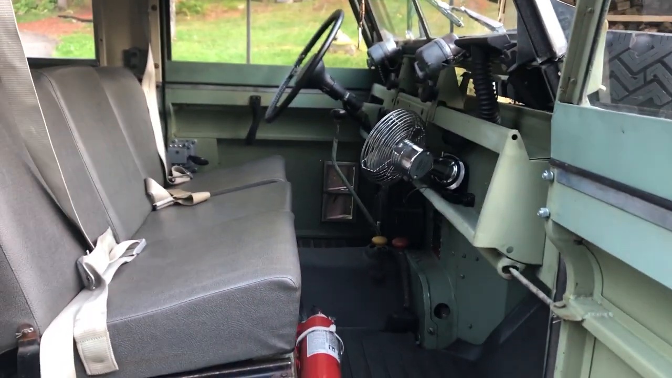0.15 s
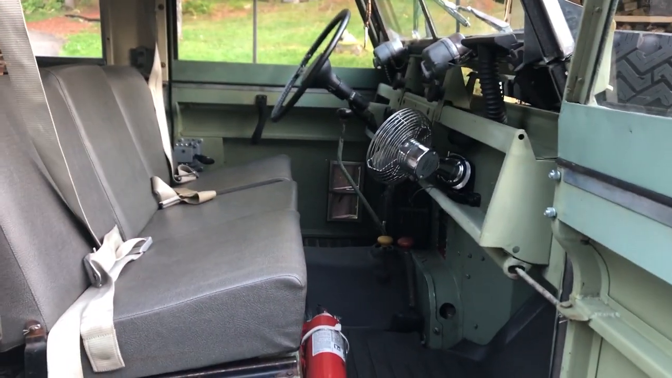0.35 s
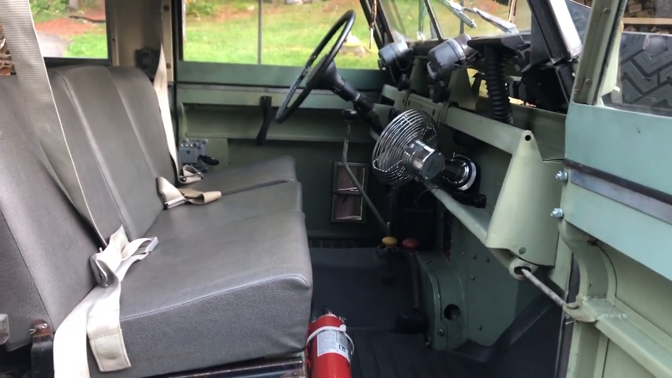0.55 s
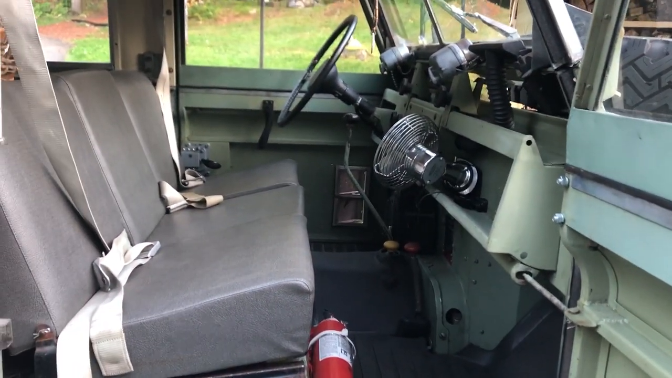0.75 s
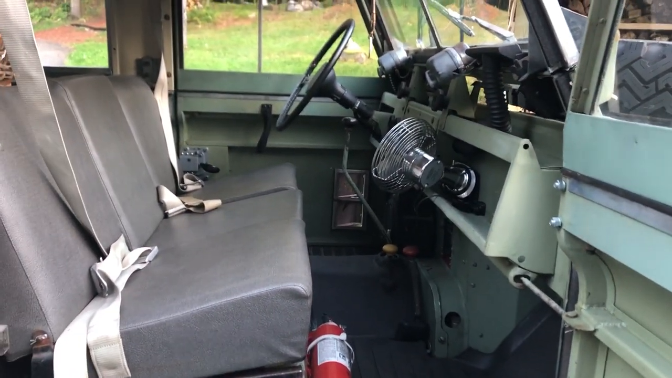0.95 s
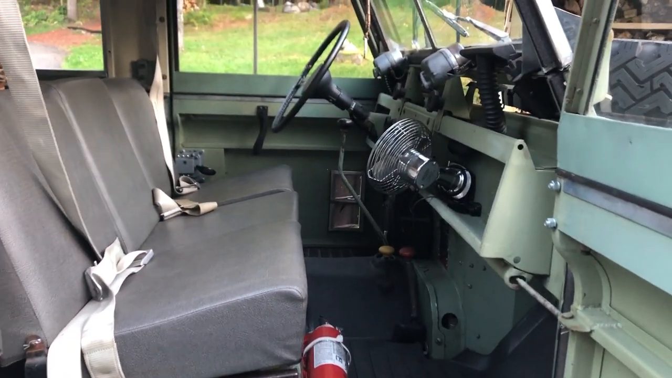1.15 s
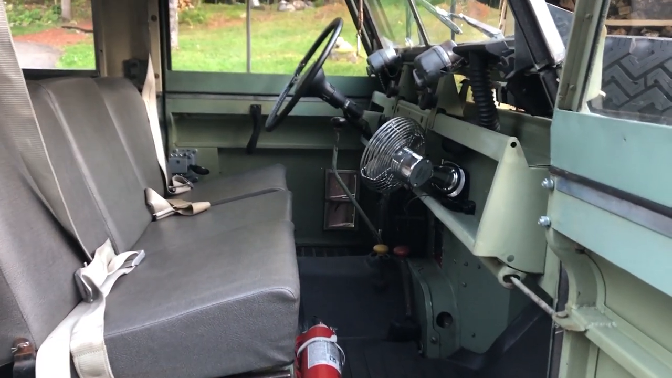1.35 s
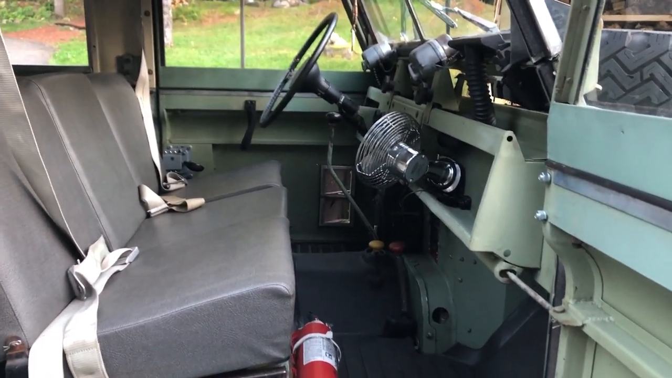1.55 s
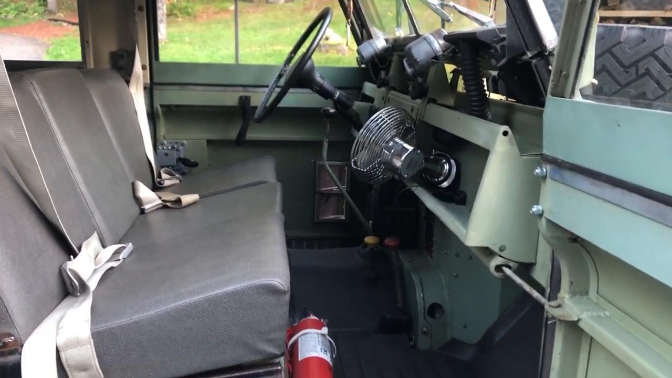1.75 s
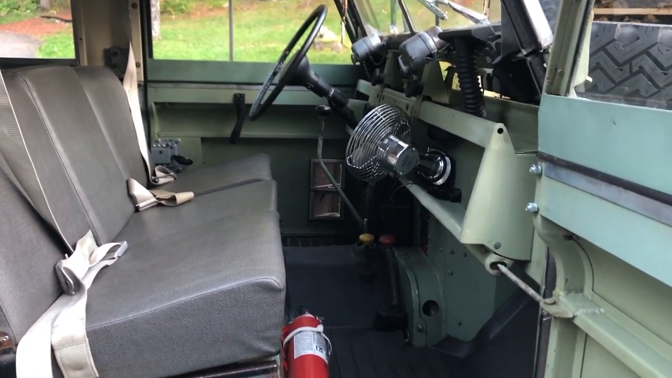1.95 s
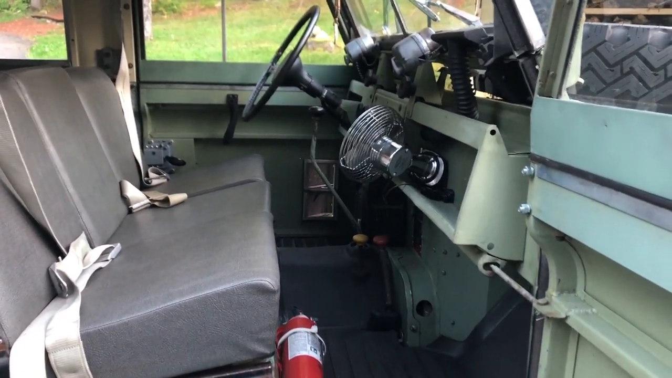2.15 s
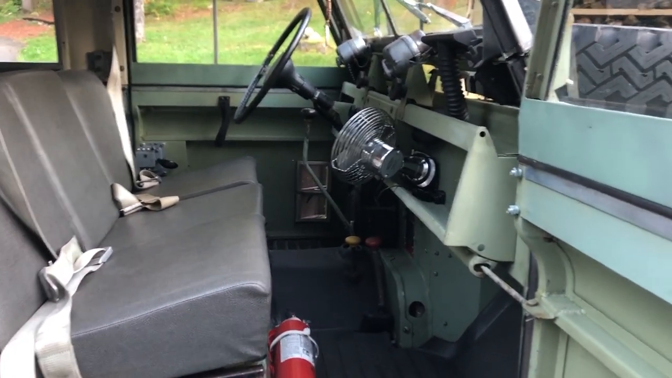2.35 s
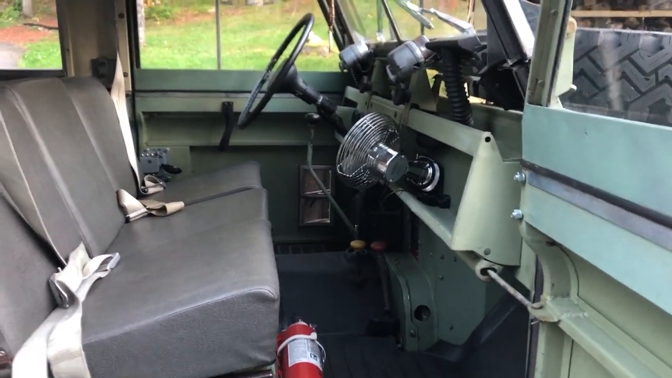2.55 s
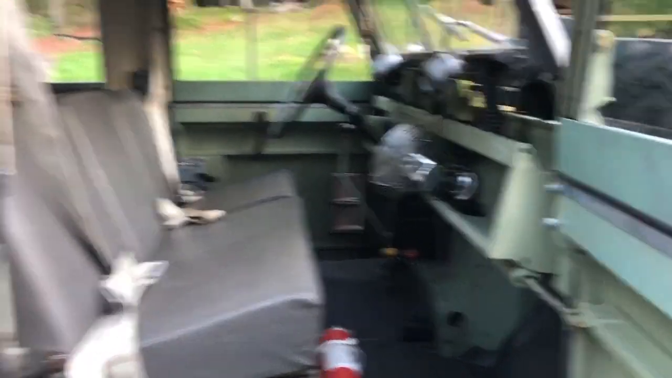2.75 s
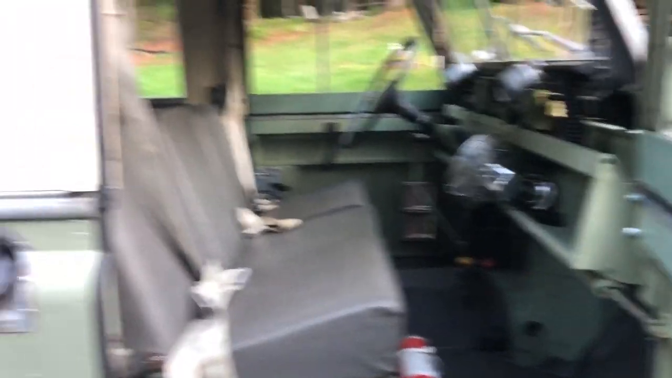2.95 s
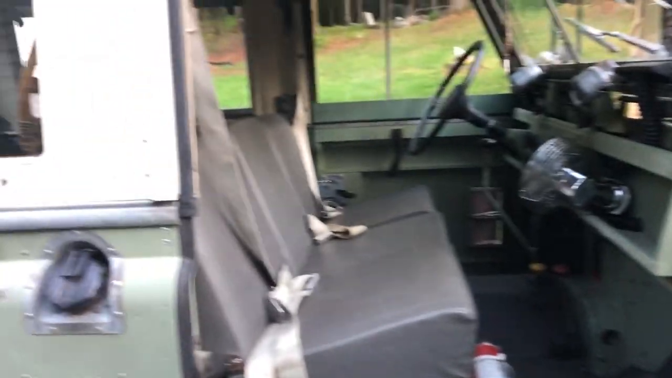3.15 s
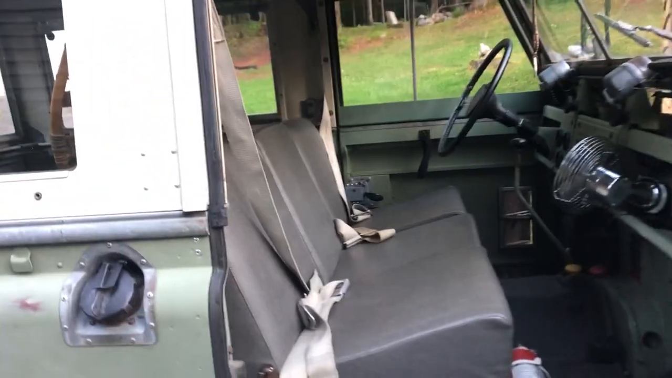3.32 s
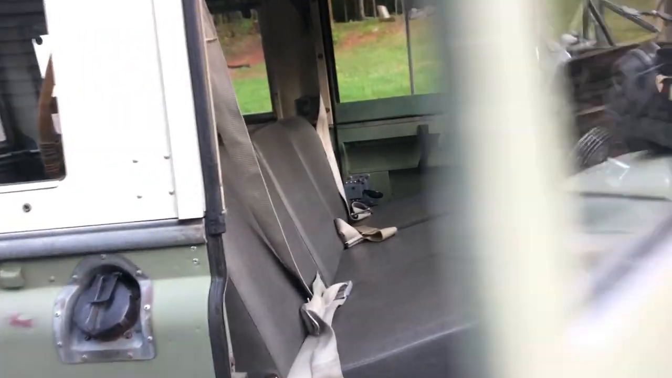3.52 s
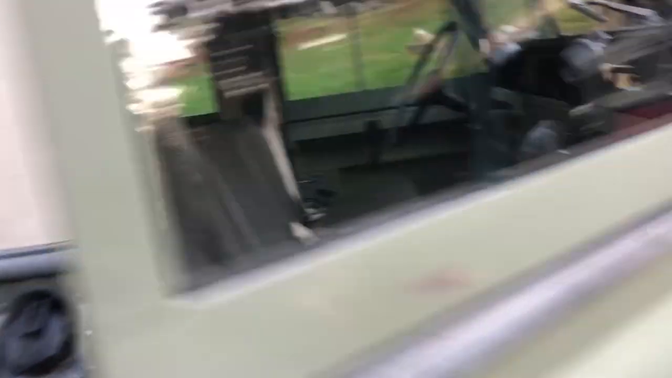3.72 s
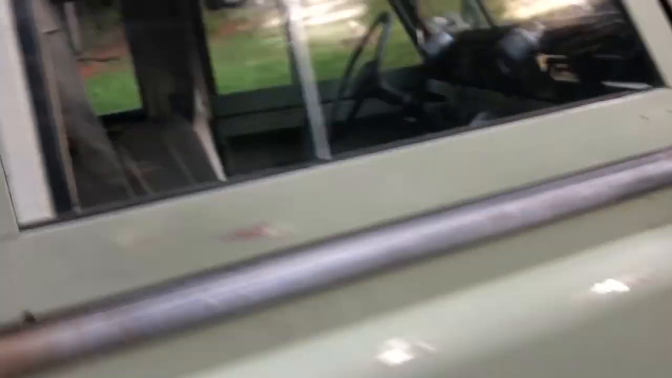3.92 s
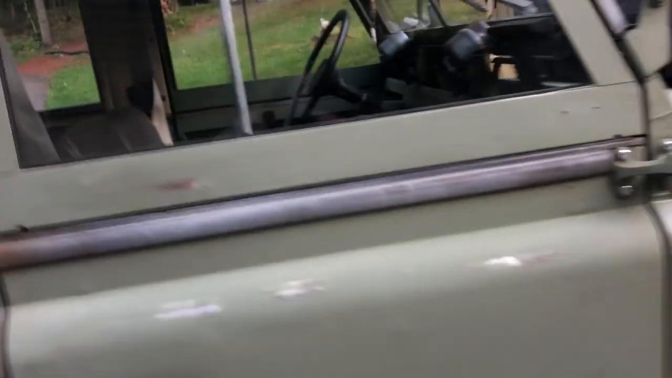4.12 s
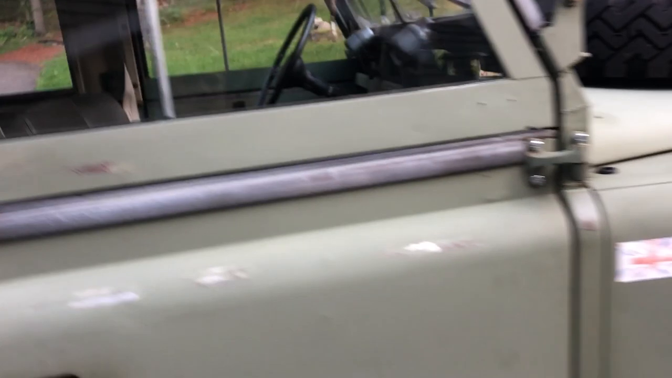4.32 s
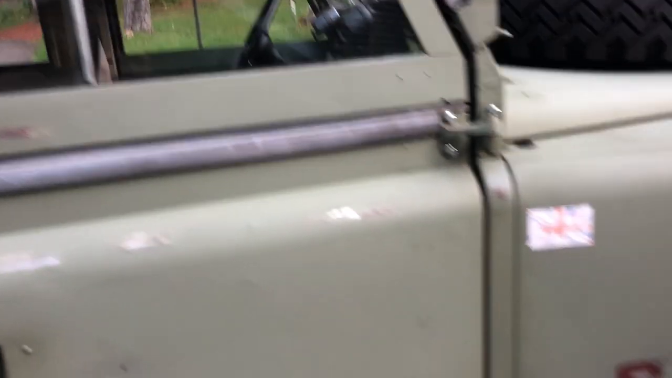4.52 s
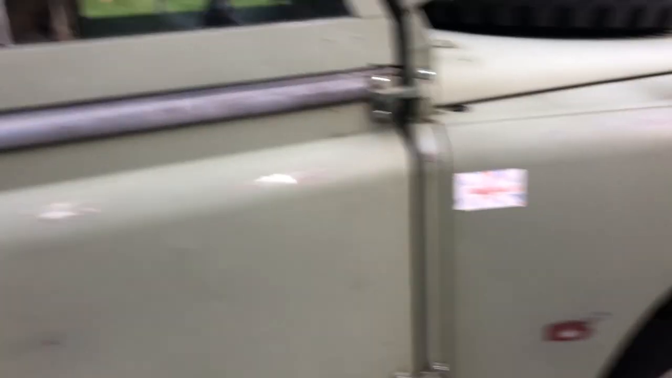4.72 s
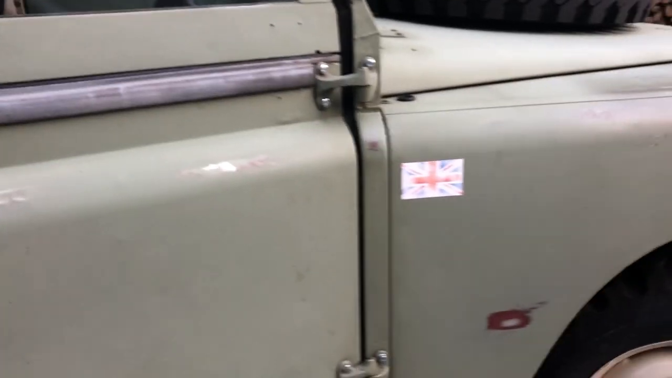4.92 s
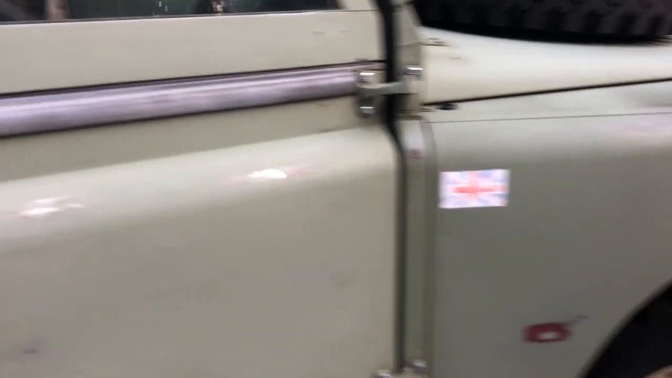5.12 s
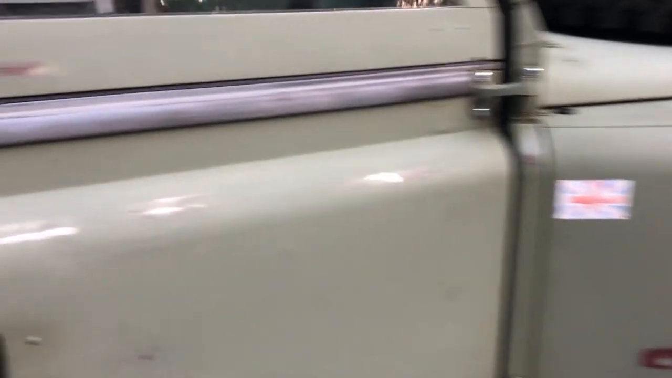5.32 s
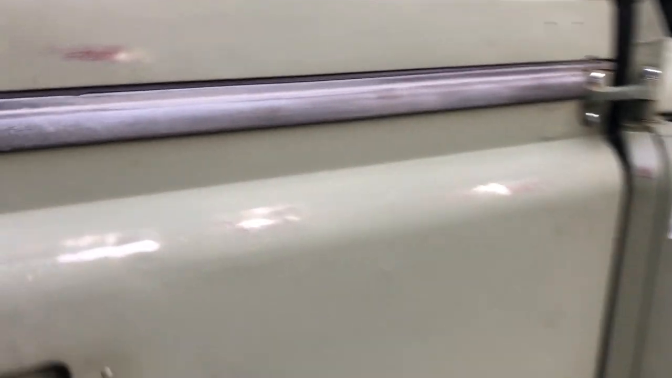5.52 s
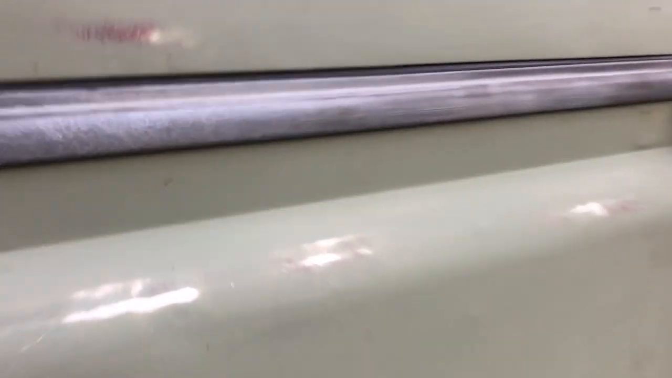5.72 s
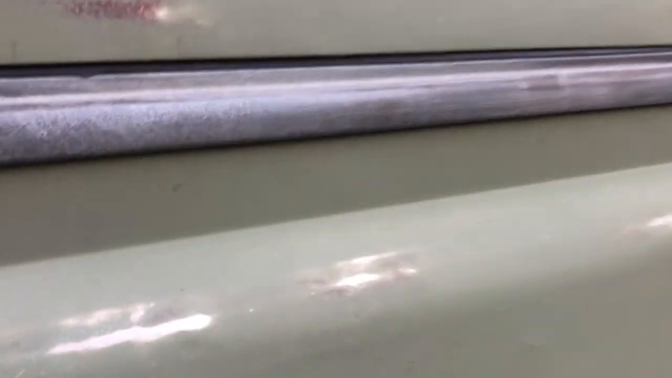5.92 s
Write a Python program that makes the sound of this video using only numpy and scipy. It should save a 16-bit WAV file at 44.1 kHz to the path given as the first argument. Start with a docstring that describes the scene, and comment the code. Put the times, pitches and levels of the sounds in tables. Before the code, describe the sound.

In quiet outdoor air, faint scuffs and small ticks lead up to the slam of an old off-road vehicle's heavy metal door, close to the microphone. Latch, edge and frame strike in quick succession, making one loud clanging bang. Loose fittings rattle briefly while the body booms and fades. A short, faint low tone slides upward, and a soft knock follows near the end.

```python
"""Outdoors in quiet air, the microphone close to the sheet-metal door of an old off-road vehicle.
Faint scuffs and ticks come first; then the door slams: latch, edge and frame strike in quick succession.
The panels clang, loose fittings chatter and the body booms on; a short low tone glides up, and a late
soft knock follows. Far off, a thin insect trill fades out before the slam."""
import sys
import numpy as np
from scipy import signal
from scipy.fft import rfft, irfft
from scipy.io import wavfile

SR = 44100
rng = np.random.default_rng(int(sys.argv[2]) if len(sys.argv) > 2 else 0)


def master(y):
    """Save y as 16-bit WAV."""
    cut = np.clip(np.atleast_2d(y).T, -1, 1)
    pcm = np.round(cut * 32767)  # scale
    wavfile.write(sys.argv[1], SR, pcm.astype(np.int16))


N = 267585

# blows of the door, close to the microphone:
# (time [s], crack [dB], hardness [0-1], latch relative to crack [dB], clang [dB], push on the body [dB])
BLOWS = [(4.1667, -47.5, 0.66, -16, -50.5, -61.5), (4.1897, -7, 0.9, -20.5, -21, -13),
         (4.2082, -6, 0.92, -12, -22, -16.5), (4.2185, -26, .4, -16.5, -18.5, -20.5),
         (4.2389, -15.5, 0.6, -16.5, -15.5, -0.5), (4.2658, -13.5, 0.84, -15.5, -26.5, -14.5),
         (4.2984, -6.5, 1, -18, -20.5, -20.5), (4.322, -25, 0, -12, -27, -33.5),
         (4.3490, -23, .8, -21, -59, -15.5)]
def slam():
    """Each blow cracks, rings the latch, clangs the panels and pushes the body into its modes."""
    out, t = np.zeros(N), clock(32768)[0]
    body, latch = body_boom(), latch_ring(t)
    for s, crack_db, hardness, latch_db, clang_db, push_db in BLOWS:
        add(out, s, amp(crack_db) * (crack(hardness, len(t)) + amp(latch_db) * latch))
        add(out, s, amp(clang_db) * panel_clang(t))
        add(out, s, amp(push_db) * body)
    return out

def heaviest_blow():
    """The moment at which the door's full weight meets the frame."""
    return max(BLOWS, key=lambda row: row[-1])[0]

# spectrum of the contact before hardness tilts it: (frequency [Hz], level [dB])
CRACK_SPECTRUM = [(150, -29.5), (500, -1), (900, 1), (2000, -0.5), (3200, 5.5), (5000, -5), (9000, -7.5),
                  (13000, -12.5), (16000, -14)]
def crack(hardness, size, soft_t60=0.13, hard_t60=0.028):
    """Metal meets metal in a burst of noise; a harder blow is shorter and brighter."""
    t, hz = clock(size)
    t60 = soft_t60 * (hard_t60 / soft_t60) ** hardness
    tilt_db_per_octave = -6 + 8 * hardness
    spectrum = read(CRACK_SPECTRUM, hz) + tilt_db_per_octave * np.log2((hz + 1) / SR)
    return noise(spectrum) * fade(t, t60, rise=0.0011)

# modes of the latch steel: (frequency [Hz], level [dB], t60 [s])
LATCH_MODES = [(2940, -2.5, 0.1), (2980, -5.5, 0.16), (3250, -4.5, 0.064), (3537, 2, 0.059),
               (4150, -8, 0.12), (6500, -9.5, 0.091), (8440, -6.5, 0.055), (10930, -5, 0.071)]
def latch_ring(t):
    """The struck latch rings high and briefly."""
    return modes(LATCH_MODES, t)

# spectrum of the panels: (frequency [Hz], level [dB])
CLANG_SPECTRUM = [(120, -22), (250, -1), (400, 1), (650, -0.5), (1100, -0.5), (2000, -5.5), (3200, -8),
                  (5000, -12), (10000, -18.5), (16000, -28.5)]
# decay of the panels: (frequency [Hz], t60 [s])
CLANG_DECAY = [(200, 1), (600, 0.36), (1500, 0.23), (4000, 0.27), (9000, 0.2), (16000, 0.25)]
# modes of the door skin: (frequency [Hz], level [dB], t60 [s])
SKIN_MODES = [(380.5, -5.5, 0.17), (505, -10, 0.29), (618.4, -7.5, 0.57), (817, -9, .26), (852, -12, 0.38),
              (980, -19.5, 0.22), (1337, -11, 0.17), (1687, -20, 0.48), (1918, -15.5, 0.19)]
def panel_clang(t):
    """The door skin's own notes ring over a wash of crowded panel modes."""
    return wash(CLANG_SPECTRUM, CLANG_DECAY, rise=0.0018, size=len(t)) + amp(-1) * modes(SKIN_MODES, t)

# low modes of the vehicle's body: (frequency [Hz], level [dB], t60 [s])
BODY_MODES = [(42.5, -34.5, 5.9), (45.3, -17.5, 0.4), (61.63, -21.5, .5), (84, -45, 4.8), (88.3, -20, 0.81),
              (111.8, -26.5, 2.2), (126.6, -26, 1.6), (137, -18.5, 0.49), (154, -23.5, 1.32),
              (172.6, -12, .8), (186, -29, 1.14), (193.5, -25, 0.62), (210.7, -17.5, 0.92), (247, -34, 1.5),
              (269, -20.5, .35), (278, -23, 1.9), (288.7, -31, 1.1), (290.6, -24.5, 0.91),
              (380, -32.5, 0.97), (390, -26.5, 0.36), (408.3, -19.5, 0.32)]
def body_boom(rise=0.0051):
    """The body's answer to one soft push."""
    t = clock(98304)[0]
    return modes(BODY_MODES, t) * (1 - np.exp(-t / rise))

# bounces of the door on its rubber seal: (time [s], frequency [Hz], level [dB])
SEAL_BOUNCES = [(4.190, 356, -14.5), (4.19, 217, -19.5), (4.239, 247.6, -3), (4.255, 198, -8),
                (4.274, 242, -4.5), (4.308, 203.5, -10), (4.422, 143, -26)]
def seal_thumps():
    """The seal damps each bounce to a short, dull thump."""
    out, t = np.zeros(N), clock(8192)[0]
    for s, hz, db in SEAL_BOUNCES:
        add(out, s, amp(db) * np.sin(2 * np.pi * hz * t) * fade(t, t60=0.09, rise=0.0019))
    return out

# spectrum of the cab's lingering ring: (frequency [Hz], level [dB])
CAB_SPECTRUM = [(70, -5), (150, -2), (350, 5), (600, 4.5), (1100, -1), (1800, -4.5), (2600, -5), (4300, -4),
                (7000, -17), (12000, -21.5), (16000, -29.5)]
# decay of that ring: (frequency [Hz], t60 [s])
CAB_DECAY = [(200, 3.5), (600, 1.6), (1300, 1.8), (4000, 1.1), (9000, 0.95), (16000, .9)]
def cab_ring():
    """The cab rings on after the heaviest push."""
    return place(heaviest_blow(), amp(-38) * wash(CAB_SPECTRUM, CAB_DECAY, rise=0.022, size=81920))

def bolt_drop(at_s=4.306, spring_hz=14625):
    """The latch spring zings in one very high mode as the bolt drops; thin metal fizzes on."""
    t, hz = clock(32768)
    zing = amp(-10) * np.sin(2 * np.pi * spring_hz * t) * fade(t, t60=0.08, rise=0.004)
    fizz = amp(-51) * noise(hump(hz, 12500, octaves=0.8)) * fade(t, t60=0.7)
    return place(at_s, zing + fizz)

# modes of the loose fittings: (frequency [Hz], level [dB], t60 [s])
FITTING_MODES = [(1000, 1.5, 0.11), (1107.4, 2, 0.061), (1395, -5.5, 0.081), (1647, -2, 0.11),
                 (1752, -0.5, 0.074), (3165, -11, .07), (4155, 1.5, .06), (4310, 0.5, 0.055),
                 (5240, -3.5, .06), (5981, -7.5, 0.065), (6800, -11, .06), (9150, -9, 0.053)]
# jumps of the fittings: (time [s])
RATTLE_TIMES = [4.3855, 4.4357, 4.4586, 4.4917, 4.5328, 4.5535, 4.564, 4.628, 4.7044, 4.7345, 4.775, 4.829,
                4.8784]
def rattles(first_db=-39.5, fall_db_per_s=44.5):
    """Loose metal taps its seat and rings briefly, ever more weakly as the shaking dies."""
    out, (t, hz) = np.zeros(N), clock(8192)
    ring = amp(-10) * modes(FITTING_MODES, t)
    for s in RATTLE_TIMES:
        db = first_db - fall_db_per_s * (s - RATTLE_TIMES[0])
        tap = noise(hump(hz, 3000, octaves=0.86)) * fade(t, t60=0.06, rise=0.0019)
        add(out, s, amp(db) * (tap + ring))
    return out

def buzz(from_s=4.344, until_s=4.98, release_s=0.1, contacts_per_s=700):
    """Tiny contacts, bunched on each swing of the lowest body mode, ring the loose fittings."""
    t, hz = clock(32768)
    sway = 1 + np.sin(2 * np.pi * BODY_MODES[0][0] * t)
    contacts = rng.standard_normal(len(t)) * (rng.random(len(t)) < sway * contacts_per_s / SR)
    clicks = unit(irfft(rfft(contacts) * amp(hump(hz, 1300, octaves=1.15))))
    ring = unit(signal.fftconvolve(clicks, modes(FITTING_MODES, t))[:len(t)])
    # the shaking weakens as 1 / time since the slam, until it cannot lift the fittings
    age = from_s + t - heaviest_blow()
    shaking = age[0] / age * np.clip((until_s - from_s - t) / release_s, 0, 1)
    return place(from_s, amp(-45) * shaking * unit(ring + amp(-3) * clicks))

def groan(at_s=5.09, start_hz=183.8, rise_hz_per_s=614):
    """A nearly pure low tone glides up as the vehicle settles."""
    t = clock(8192)[0]
    phase = 2 * np.pi * np.cumsum(start_hz + rise_hz_per_s * t) / SR
    level = amp(-40) * swell(t, attack=0.014, hold=0.061, release=0.027)
    return place(at_s, level * (np.sin(phase) + amp(-24) * np.sin(2 * phase)))

# late knocks on the body: (time [s], thud [dB], centre [Hz], width [octaves], t60 [s], push [dB])
KNOCKS = [(5.787, -36, 135, 0.45, 0.094, -38), (5.791, -43, 398, 0.11, 0.11, -44),
          (5.836, -36.5, 90, 1, 0.065, -32.5)]
def knocks(cutoff_hz=250):
    """Soft thuds set the body ringing faintly, mostly in its lowest modes."""
    out = taps([row[:-1] for row in KNOCKS], rise=0.0036)
    body = signal.sosfilt(signal.butter(2, cutoff_hz, fs=SR, output="sos"), body_boom())
    for s, *_, push_db in KNOCKS:
        add(out, s, amp(push_db) * body)
    return out

def door_swing(swish_s=3.462, rush_s=3.7, rise_db_per_s=17):
    """The door starts with a dry swish, then pushes air ahead of it, louder as the gap narrows."""
    stroke = swell(clock(16384)[0], attack=0.021, hold=0.078, release=0.14)
    swish = amp(-59.5) * stroke * friction(2170, octaves=0.9)
    t, hz = clock(32768)
    s_to_go = heaviest_blow() - rush_s - t
    closing = amp(-62 - rise_db_per_s * s_to_go) * (s_to_go > 0)
    rush = closing * noise(hump(hz, 290, octaves=1.4))
    return place(swish_s, swish) + place(rush_s, rush)

# faint ticks around the slam: (time [s], level [dB], centre [Hz], width [octaves], t60 [s])
METAL_TICKS = [(3.228, -64.5, 845, 1, 0.19), (3.571, -51, 1490, 1.43, 0.074), (3.8, -61, 4130, 0.69, .03),
               (3.992, -64.5, 3860, 0.83, 0.22), (4.095, -62, 3070, .5, 0.037),
               (4.931, -50.5, 980, 0.4, .044), (5.026, -63.5, 1185, 0.8, 0.13),
               (5.545, -63.5, 1283, 1.5, 0.15), (5.587, -55, 1270, .32, 0.054),
               (5.710, -64, 1880, 1.06, .15), (5.7736, -48.5, 1260, 1.6, 0.1),
               (5.788, -52.5, 812, 0.33, .23), (5.819, -57.5, 2000, 1.96, 0.12)]
def ticks():
    """Light contacts of small metal parts."""
    return taps(METAL_TICKS, rise=0.00031)

# shoes and clothing, faint at the microphone: (mid time [s], length [s], level [dB], centre [Hz])
SCUFFS = [(0.969, .15, -68.5, 199), (1.024, .08, -67.5, 2950), (1.309, 0.056, -74, 2300),
          (1.736, .11, -73, 4970), (1.967, .12, -72, 3980), (2.812, 0.15, -69.5, 384),
          (3.088, .095, -65, 4800), (3.318, 0.084, -71, 6000), (3.866, 0.067, -58.5, 3860),
          (6.052, 0.054, -62, 666)]
def scuffs():
    """Friction swells and dies with each stroke."""
    out, t = np.zeros(N), clock(16384)[0]
    for s, length, db, centre_hz in SCUFFS:
        stroke = np.sin(np.pi * np.minimum(t / length, 1))
        add(out, s - length / 2, amp(db) * stroke * friction(centre_hz, octaves=1.26))
    return out

# open air around the microphone: (frequency [Hz], level [dB])
AIR_SPECTRUM = [(15, -40.5), (25, -6), (43, -4), (70, -2.5), (102, 1), (185, -3), (734, -12.5),
                (2280, -21), (2480, -19), (2690, -22), (3520, -22), (5430, -26), (13600, -31.5),
                (16000, -26)]
def outdoors(trill_hz=2520, trill_end_s=3.381):
    """Quiet, steady air, and a far insect trill that fades as the microphone turns away."""
    t, hz = clock(N + N % 2)
    air = amp(-69) * noise(read(AIR_SPECTRUM, hz))
    facing = np.clip((trill_end_s - t) / 0.5, 0, 1)
    trill = amp(-90) * noise(hump(hz, trill_hz, octaves=0.014)) * facing
    return (air + trill)[:N]

def modes(table, t):
    """A struck object rings as a sum of decaying sines."""
    return sum(amp(db) * fade(t, t60) * np.sin(2 * np.pi * hz * t) for hz, db, t60 in table)

def wash(spectrum, decay, rise, size):
    """Countless crowded panel modes: noise in which each band dies at its own speed."""
    t, hz = clock(size)
    band_hz, frame_s, bands = signal.stft(noise(read(spectrum, hz)), SR, nperseg=512)
    bands *= np.exp(-np.log(1000) * frame_s / read(decay, band_hz)[:, None])
    return signal.istft(bands, SR, nperseg=512)[1][:size] * (1 - np.exp(-t / rise))

def taps(table, rise):
    """Dead contacts: bursts of noise with no ring."""
    out, (t, hz) = np.zeros(N), clock(16384)
    for s, db, centre_hz, octaves, t60 in table:
        add(out, s, amp(db) * noise(hump(hz, centre_hz, octaves)) * fade(t, t60, rise))
    return out

def friction(centre_hz, octaves, grain_db=2):
    """Grainy rubbing noise of rms near 1."""
    hz = clock(16384)[1]
    grain = amp(grain_db * noise(hump(hz, 230, octaves=3.3)))
    return grain * noise(hump(hz, centre_hz, octaves))

def noise(db):
    """Noise of rms 1 whose spectrum has the given shape."""
    return unit(irfft(amp(db) * np.exp(2j * np.pi * rng.random(len(db)))))

def hump(hz, centre_hz, octaves):
    """A bell-shaped spectrum in dB."""
    return -10 / np.log(10) * (np.log2((hz + 1) / centre_hz) / octaves) ** 2

def read(points, hz):
    """Reads a table on a log-frequency axis."""
    point_hz, value = np.transpose(points)
    return np.interp(np.log(hz + 1), np.log(point_hz + 1), value)

def fade(t, t60, rise=0.00022):
    """A quick rise and an exponential decay, timed in seconds."""
    return (1 - np.exp(-t / rise)) * np.exp(-np.log(1000) * t / t60)

def swell(t, attack, hold, release):
    """An envelope that rises, holds and falls in straight lines, timed in seconds."""
    return np.clip(np.minimum(t / attack, 1 - (t - attack - hold) / release), 0, 1)

def amp(db):
    """Decibels to gain."""
    return 10 ** (np.asarray(db) / 20)

def unit(x):
    """Scales to rms 1."""
    return x / np.sqrt(np.mean(x ** 2) + 1e-20)

def clock(size):
    """Times [s] and spectral bins [Hz] of a sound of this many samples."""
    return np.arange(size) / SR, np.fft.rfftfreq(size, 1 / SR)

def add(mix, s, sound):
    """Mixes a sound in at time s."""
    part = mix[max(round(s * SR), 0):][:len(sound)]
    part += sound[:len(part)]

def place(s, sound):
    """A track with one sound at time s."""
    out = np.zeros(N)
    add(out, s, sound)
    return out

def scene():
    """The door up close, small sounds around it and open air behind, in mono."""
    door = door_swing() + slam() + seal_thumps() + cab_ring() + bolt_drop()
    settling = rattles() + buzz() + groan() + knocks()
    return (door + settling + ticks() + scuffs() + outdoors())[None]

def record(dry, ceiling=0.92, low_cut_hz=33, high_cut_hz=16100):
    """The close microphone sheds deep rumble, rounds the highest peaks and loses the top treble."""
    low_cut = signal.butter(4, low_cut_hz, "high", fs=SR, output="sos")
    high_cut = signal.firwin(511, high_cut_hz, window=("kaiser", 9), fs=SR)
    rounded = ceiling * np.tanh(signal.sosfilt(low_cut, dry) / ceiling)
    return signal.oaconvolve(rounded, high_cut[None], "same")

dry = scene()
out = record(dry)
master(out)
```